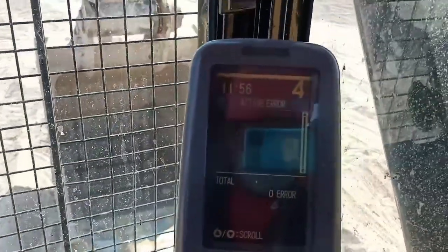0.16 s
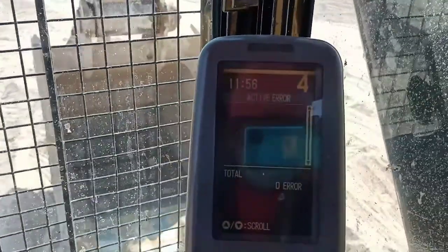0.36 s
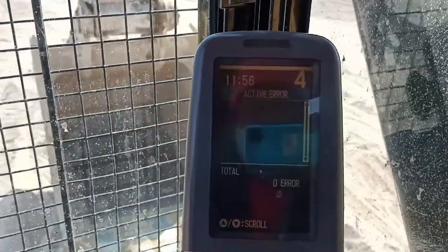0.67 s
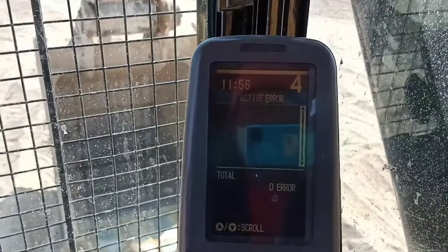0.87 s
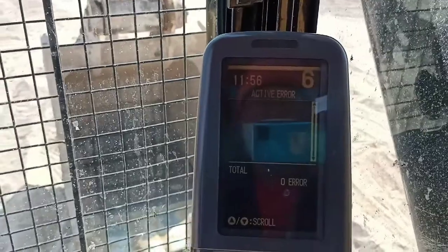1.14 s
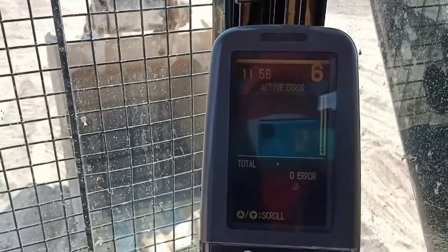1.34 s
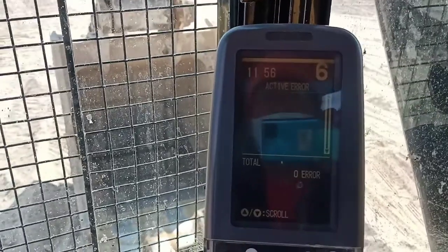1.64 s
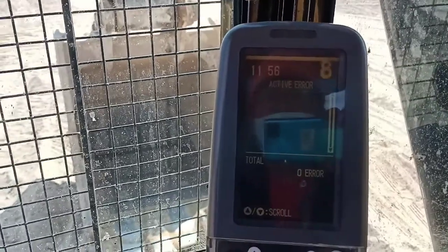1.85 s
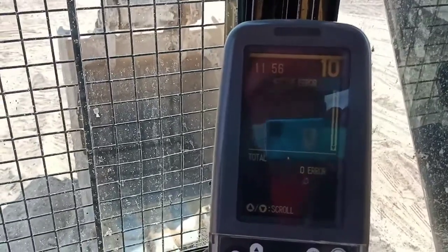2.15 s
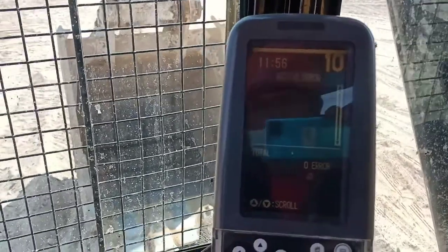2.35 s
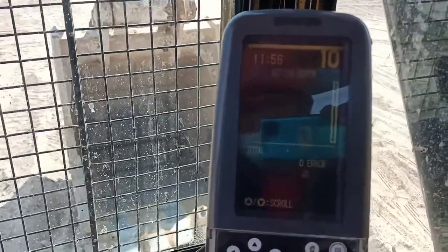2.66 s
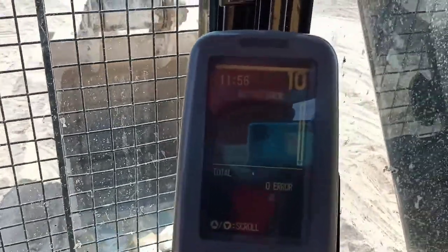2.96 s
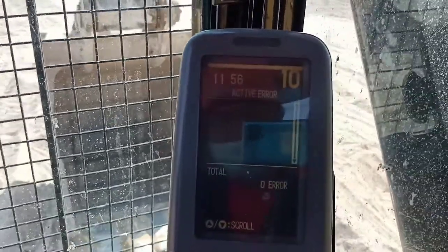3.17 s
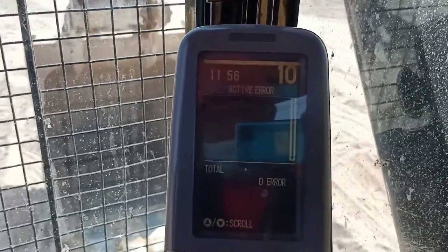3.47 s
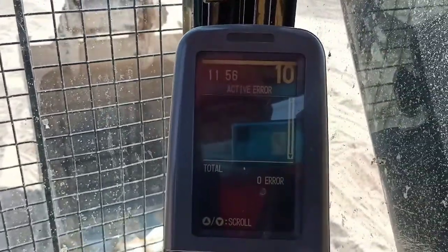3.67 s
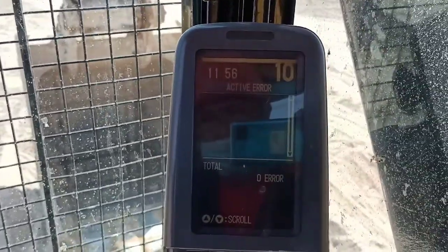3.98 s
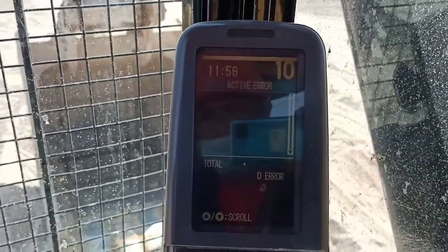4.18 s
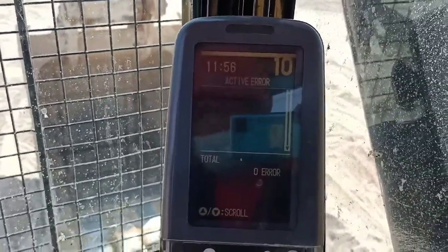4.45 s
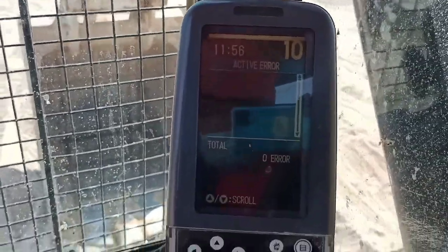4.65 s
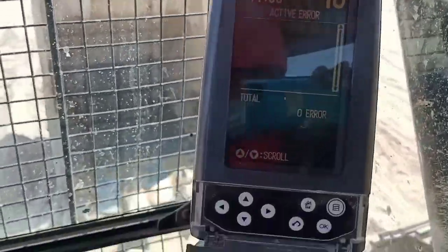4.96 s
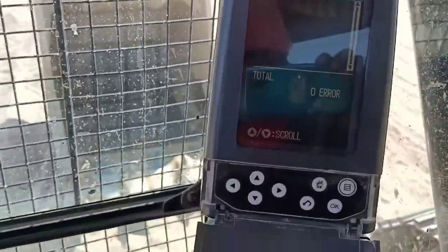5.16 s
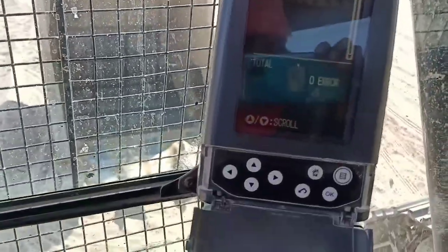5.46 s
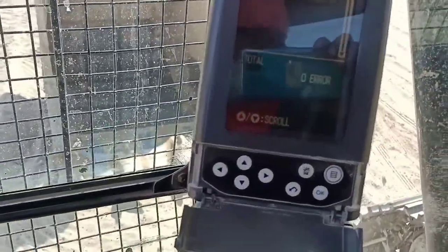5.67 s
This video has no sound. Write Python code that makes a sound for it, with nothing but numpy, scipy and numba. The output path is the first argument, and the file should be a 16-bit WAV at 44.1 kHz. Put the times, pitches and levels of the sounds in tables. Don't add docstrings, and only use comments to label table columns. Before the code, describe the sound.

Deep diesel idle rises twice after small plastic dial clicks, settles into a loud clattering roar, and a loose metal fitting cracks once.

```python
import sys
import numpy as np
from scipy import signal
from scipy.fft import rfft, irfft
from scipy.io import wavfile
from scipy.ndimage import uniform_filter1d
from numba import njit

SR = 44100
rng = np.random.default_rng(int(sys.argv[2]) if len(sys.argv) > 2 else 0)


def unload_audio(sound):
    columns = np.transpose(np.atleast_2d(sound))
    steps = np.round(np.clip(columns, -1, 1) * 32767)
    wavfile.write(sys.argv[1], SR, steps.astype(np.int16))


def makeup_ratio(level_db):
    decades = np.asarray(level_db, float) / 20
    return 10 ** decades


N = 256662

STEPS_HZ = [65, 80, 99]
LAGS = [(.43, -0.054, -0.32), (.62, -.2, -0.41), (1.1, -.78, -.67)]
# idle, middle, full speed [level/dB], answer to more fuel, to less fuel [dB per dB]
SUCTION = (-1.4, -0.21, -0.3, 0.044, 0.15)


def unit(x):
    return x / np.sqrt(np.mean(x ** 2))


def curves(table):
    s, *columns = np.transpose(table)
    return [np.interp(np.arange(N) / SR, s, column) for column in columns]


@njit
def svf(x, hz, width):
    y, band, low = np.empty(len(x)), 0., 0.
    g, k = np.tan(np.pi * hz / SR), width / hz
    for i in range(len(x)):
        v = (band + g * (x[i] - low)) / (1 + g * (g + k))
        band, low, y[i] = 2 * v - band, low + 2 * g * v, k * v
    return y


def steep(x, hz, width):
    return svf(svf(x, float(hz), float(width)), float(hz), float(width))


def resonate(x, modes):
    out = 0
    for k, (hz, width, db) in enumerate(modes):
        out = out + (-1) ** k * makeup_ratio(db) * steep(x, hz, 1.58 * width)
    return unit(out)


def coloured(spectrum):
    hz, db = np.transpose(spectrum)
    f = np.arange(N // 2 + 1) * SR / N + 1
    gain = makeup_ratio(np.interp(np.log(f), np.log(hz), db))
    return unit(irfft(rfft(rng.standard_normal(N)) * gain, N))


def walk(rate):
    k = int(SR / rate)
    held = np.repeat(rng.standard_normal(N // k + 1), k)
    return 1.44 * uniform_filter1d(uniform_filter1d(held, k), k)[:N]


def partial(cycle, order, db, turns):
    return np.sqrt(2) * makeup_ratio(db) * np.cos(2 * np.pi * (order * cycle + turns))


def clatter(cycle, repeat):
    frozen = rng.standard_normal(2048)
    same = np.interp(cycle % 1 * 2048, np.arange(2049), np.r_[frozen, frozen[0]])
    return np.sqrt(repeat) * unit(same) + np.sqrt(1 - repeat) * rng.standard_normal(N)


def follow(layer, hz, drive):
    *steady_db, more, less = layer
    return np.interp(hz, STEPS_HZ, steady_db) + more * np.maximum(drive, 0) + less * np.minimum(drive, 0)


def through(path, hz):
    path_hz, path_db = np.transpose(path)
    return np.interp(np.log(hz), np.log(path_hz), path_db)


def brushed_air():
    # t/s, swell level/dB, half length [s]
    brushes = [
        (.98, 12, .2),
        (4.75, 3, .3),
    ]
    t = np.arange(N) / SR
    air_db = -81 - 0.5 * walk(3.6) + .8 * walk(12)
    for s, db, half in brushes:
        air_db = air_db + db * np.exp(-((t - s) / half) ** 2)
    return coloured([(9000, -32), (12500, -2), (15000, -5), (15450, -7), (15900, -37)]) * makeup_ratio(air_db)


def cab_floor(hz, fuel_db, hiss_db):
    # f/Hz, level/dB
    rumble_spectrum = [(30, -32), (60, 1), (90, 1), (150, 10.5), (200, 6), (330, 1.5), (420, -5),
                       (600, -45), (1200, -46.5)]
    # idle, middle, full speed [level/dB], answer to more fuel, to less fuel [dB per dB]
    floor_shake = (-63, -57, -57, .9, -.7)
    rumble_db = -39 + 0.45 * (hiss_db + 63) + follow(SUCTION, hz, fuel_db) + 1.2 * walk(9)
    shake_db = follow(floor_shake, hz, fuel_db) + 3 * walk(3.2)
    shake = coloured([(10, -19), (25, -3), (50, 7), (62, -22), (100, -58)])
    return coloured(rumble_spectrum) * makeup_ratio(rumble_db) + shake * makeup_ratio(shake_db)


def fan(hiss_db, burst):
    # f/Hz, level/dB
    fan_spectrum = [(1940, -4.5), (3300, -2.5), (3790, -5), (4030, -7), (4370, -5), (4740, -2), (5280, -10),
                    (5720, -7.5), (6240, -13), (6760, -9.5), (7630, -22.5), (9810, -14.5), (11000, -20.5),
                    (13000, -38.5)]
    return coloured(fan_spectrum) * (0.5 + 0.063 * burst) * makeup_ratio(hiss_db + 6.5 + 0.9 * walk(13))


def dial():
    # t/s, peak level/dB, ring f/Hz, ring share level/dB, bright edge level/dB
    clicks = [(1.199, -40.5, 5800, -2, -4), (1.203, -37, 4190, 12, -6), (1.2528, -38, 6700, 1, -1),
              (1.255, -38.5, 4600, 12, -7), (2.0323, -40, 5200, 4, 0), (2.0365, -34.5, 4368, 2, 1),
              (2.0870, -41, 8886, 2, -1), (2.0888, -31.5, 6528, -0.5, -4), (2.1403, -37, 6490, -2.5, 6),
              (2.145, -44, 5936, -1, -4), (2.184, -44, 4550, 9, 10), (2.189, -45, 6800, 6, -2),
              (4.5532, -54, 7200, -6, -1), (5.7990, -53, 7450, 4, -8)]
    out, t = np.zeros(N + SR), np.arange(SR // 8) / SR
    fall = makeup_ratio(-60 * t / 0.04) + .1 * makeup_ratio(-60 * t / 0.11)
    for s, peak_db, ring_hz, ring_db, edge_db in clicks:
        grit = rng.standard_normal(len(t)) * makeup_ratio(3 * rng.standard_normal(len(t)))
        crack = unit(steep(grit, 5300, 12000))
        ring = np.sin(2 * np.pi * ring_hz * t) * makeup_ratio(-60 * t / 0.024)
        ring += 0.71 * unit(svf(grit, float(ring_hz), 900.)) * makeup_ratio(-60 * t / 0.092)
        edge = unit(steep(grit, 14900, 4500)) * makeup_ratio(-60 * t / .05)
        click = crack + makeup_ratio(ring_db) * ring + makeup_ratio(edge_db) * edge
        out[int(s * SR):][:len(t)] += 0.36 * makeup_ratio(peak_db) * fall * click
    return out[:N]


def fitting():
    # t/s, peak level/dB, ring f/Hz, width [Hz], 60 dB decay [s]
    snaps = [
        (1.204, -29, 2730, 1210, 0.01),
        (1.2545, -33, 2720, 900, .012),
        (4.553, -27.5, 1473, 1800, 0.068),
        (4.5534, -27, 2601, 1199, 0.042),
        (4.5523, -25.5, 4250, 500, 0.04),
        (4.556, -35, 1110, 1600, 0.15),
        (4.5600, -25.5, 2460, 900, 0.021),
        (4.5660, -30, 2305, 900, 0.02),
        (4.6088, -11.5, 2200, 1600, 0.0055),
        (4.618, -33, 1250, 700, 0.027),
    ]
    out, t = np.zeros(N + SR), np.arange(SR // 8) / SR
    sag = 14
    for s, peak_db, ring_hz, width_hz, t60 in snaps:
        rattle = unit(svf(rng.standard_normal(len(t)), float(ring_hz), float(width_hz)))
        rattle *= np.minimum(t / 0.0076, 1)
        turns = ring_hz * (1 - np.exp(-sag * t)) / sag
        blow = makeup_ratio(peak_db - 60 * t / t60) * (np.sin(2 * np.pi * turns) + 0.96 * rattle)
        out[int(s * SR):][:len(t)] += steep(blow, ring_hz, 2 * ring_hz)
    return out[:N]


def gears(cycle, hz, fuel_db):
    # f/Hz, level/dB
    gear_lines = [(462, -60), (479, -54.5), (495.3, -53.5), (559.9, -59), (592.2, -52), (646.0, -57),
                  (693, -55.5), (726.7, -58.5), (807.5, -52), (925.9, -56.5), (974, -54.5), (990.5, -59),
                  (1039, -53.5), (1087, -58.5)]
    # f/Hz, level/dB
    whines = [(1367, -61.5), (1437, -53), (1497, -57), (1782, -55), (2078, -53.5), (2196, -53), (3068, -60),
              (3838, -64)]
    # idle, middle, full speed [level/dB], answer to more fuel, to less fuel [dB per dB]
    alternator = (-66, -55, -72, .1, .1)
    fade_db = 0.31 * (hz - STEPS_HZ[-1])
    cycle_hz = STEPS_HZ[-1] / 6
    lines = [(round(f / cycle_hz), db) for f, db in gear_lines] + [(f / cycle_hz, db) for f, db in whines]
    whine_db = follow(alternator, hz, fuel_db) + walk(12)
    out = partial(cycle, 6 * 38.83, whine_db, .1 * walk(20))
    for order, db in lines:
        out = out + partial(cycle, order, db + fade_db + 0.93 * walk(6), rng.random() + 0.064 * walk(12))
    return out


def tappet(cycle, hz, pull):
    # idle, middle, full speed [level/dB], answer to speeding up, to slowing [dB per Hz/s]
    tappet_level = (-47, -46, -44.5, .15, .1)
    fall = np.exp(-((cycle - .08) % 1) / 0.11)
    ring = steep(fall * clatter(cycle, repeat=.75), 2250, 1.56 * 200)
    return unit(ring) * makeup_ratio(follow(tappet_level, hz, pull) + 1.16 * walk(11))


def knock(cycle, hz, pull):
    # f/Hz, width [Hz], level/dB
    block_modes = [(1780, 160, -10), (2056, 83, -2), (2189, 60, -2), (2362, 118, -8.5), (2580, 150, -5.5),
                   (2635, 802, -12.5), (3000, 76, -42)]
    panel_modes = [(345.2, 20, 8.5), (482, 133, -1), (731.4, 74, -0.5), (833, 90, -2), (950, 62, -2.5),
                   (1113, 156, -4.5), (1246, 81, -5.5), (1479, 232, -3)]
    # idle, middle, full speed [level/dB], answer to speeding up, to slowing [dB per Hz/s]
    block_level = (-43, -40.5, -36, .22, .12)
    panel_level = (-44, -41.5, -38.3, .15, .15)
    beat = 12 * cycle
    which = beat.astype(int)
    pattern_db = 0.76 * rng.standard_normal(12)[which % 12]
    pattern_db += 2.5 * rng.standard_normal(which[-1] + 1)[which]
    burst = 0.97 + makeup_ratio(pattern_db) * np.exp(-(beat % 1) / 1.5)
    block = resonate(burst * clatter(cycle, repeat=0.34), block_modes)
    panels = resonate((1.1 + burst) * clatter(cycle, repeat=0.24), panel_modes)
    block = block * makeup_ratio(follow(block_level, hz, pull) + .5 * walk(10))
    panels = panels * makeup_ratio(follow(panel_level, hz, pull) + 0.5 + 0.55 * walk(4.8))
    return block + panels, unit(burst)


def intake(cycle, hz, fuel_db):
    thump = [(5, -64, -62, -59), (7, -61, -46, -51), (8, -56, -44, -50), (9, -40, -37, -34),
             (10, -60, -47, -39), (11, -52, -38, -40), (13, -46, -48, -34), (14, -37, -37, -38),
             (15, -46, -58, -40), (16, -39, -42, -38), (17, -63, -49, -53), (18, -37, -41, -40),
             (19, -45, -54, -47), (21, -51, -51, -50), (22, -59, -53, -46), (23, -62, -50, -56),
             (24, -67, -55, -55), (25, -55, -52, -67), (26, -52, -47, -63)]
    depth, period, crest = (.1, 8.5, 10.2)
    lasting, wandering = (.03, .04)
    lag = np.interp(hz, STEPS_HZ, np.transpose(LAGS)[-1])
    change_db = follow(SUCTION, hz, fuel_db)
    out = 0
    for order, *steady_db in thump:
        echo = depth * np.cos(2 * np.pi * (order - crest) / period)
        smear = lag + echo + lasting * rng.standard_normal() + wandering * walk(8)
        db = np.interp(hz, STEPS_HZ, steady_db) + change_db + 0.94 * walk(14)
        out = out + partial(cycle, order, db, smear)
    return out


def exhaust(cycle, hz, fuel_db):
    # idle, middle, full speed [level/dB], answer to more fuel, to less fuel [dB per dB]
    boom_level = (-33.3, -27.5, -25.5, 1.01, 0.7)
    # f/Hz, level/dB at steady fuelling
    octave_path = [(130, -29.5), (147, -25.5), (161, -23), (168, -35), (174, -34), (180, -32), (190, -37.5),
                   (200, -43.5)]
    pump_path = [(216, -38), (240, -44), (258, -58), (268, -39), (287, -61), (312, -34.5), (331, -41),
                 (338, -29.5)]
    boom_lag, octave_lag, pump_lag = (np.interp(hz, STEPS_HZ, lag) for lag in np.transpose(LAGS))
    more_db = np.maximum(fuel_db, 0)
    boom_db = follow(boom_level, hz, fuel_db) + .5 * walk(8.4)
    octave_fuel = np.interp(hz, STEPS_HZ, (0.74, 1.14, 2.7))
    octave_db = through(octave_path, 2 * hz) + octave_fuel * more_db + 1.2 * walk(25)
    pump_db = through(pump_path, 20 * hz / 6) + 0.2 * more_db + 1.76 * walk(19)
    boom = partial(cycle, 6, boom_db, boom_lag)
    octave = partial(cycle, 12, octave_db, octave_lag)
    return boom + octave + partial(cycle, 20, pump_db, pump_lag - .05)


def scene():
    # t/s, firing rate f/Hz, fuelling over the steady need level/dB
    governor = [(0.0, 64.82, -1.5), (1.29, 64.93, 0), (1.4, 69.03, 5), (1.5, 73.87, 8.5), (1.62, 78.9, 4.5),
                (1.78, 80.76, 0.5), (2.0, 80, -1), (2.19, 80.3, 1.5), (2.34, 89.03, 7), (2.47, 99.4, 6.5),
                (2.55, 102.3, 7.5), (2.6, 102.2, -3.5), (2.66, 100.1, -4), (2.7, 98.8, -18),
                (2.78, 97.17, 2), (3.05, 99.33, -1), (4.1, 99.2, 0), (5.82, 98.65, 0)]
    # idle, middle, full speed [level/dB], answer to speeding up, to slowing [dB per Hz/s]
    hiss_level = (-57, -57.5, -54, .25, .08)
    hz, fuel_db = curves(governor)
    pull = uniform_filter1d(np.gradient(hz) * SR, int(.09 * SR))
    pull = 16 * np.tanh(pull / 16)
    cycle = np.cumsum(hz) / (6 * SR) + .07
    hiss_db = follow(hiss_level, hz, pull)
    metal, burst = knock(cycle, hz, pull)
    metal = (metal + tappet(cycle, hz, pull)) * makeup_ratio(0.24 * np.minimum(fuel_db, 0))
    background = brushed_air() + cab_floor(hz, fuel_db, hiss_db) + fan(hiss_db, burst)
    engine = gears(cycle, hz, fuel_db) + metal + intake(cycle, hz, fuel_db) + exhaust(cycle, hz, fuel_db)
    return (background + dial() + fitting() + engine)[None]


def roll_off(x):
    return signal.sosfilt(signal.butter(12, 15700, fs=SR, output="sos"), x)


def record(dry):
    rounded = np.tanh(1.494 * dry) / 1.487
    return roll_off(rounded)


dry = scene()
out = record(dry)
unload_audio(out)
```